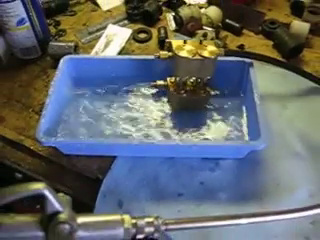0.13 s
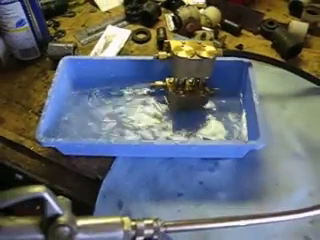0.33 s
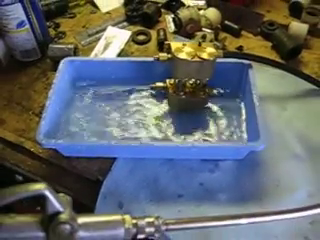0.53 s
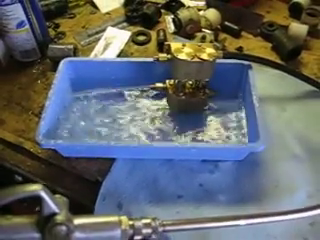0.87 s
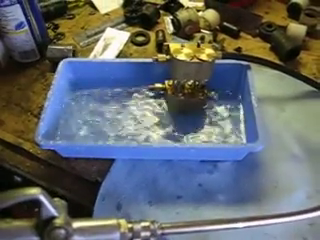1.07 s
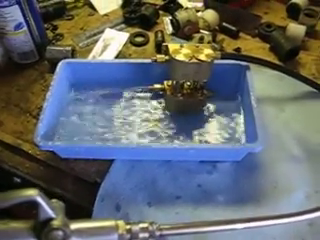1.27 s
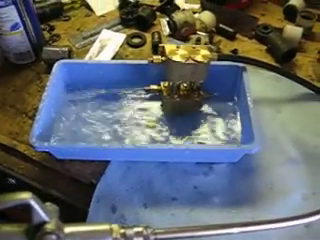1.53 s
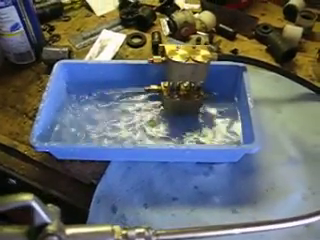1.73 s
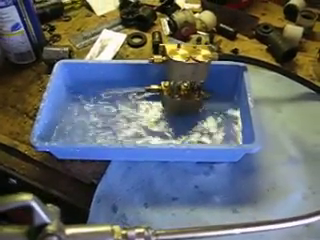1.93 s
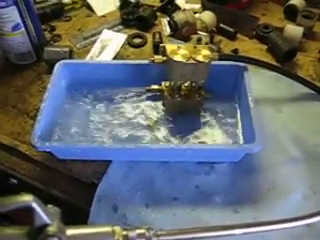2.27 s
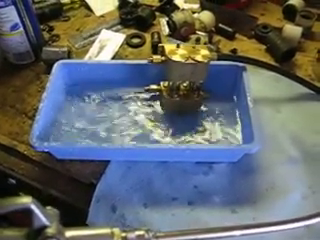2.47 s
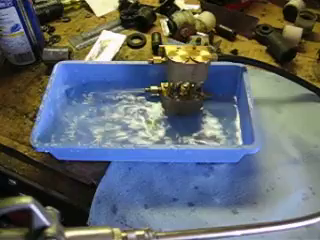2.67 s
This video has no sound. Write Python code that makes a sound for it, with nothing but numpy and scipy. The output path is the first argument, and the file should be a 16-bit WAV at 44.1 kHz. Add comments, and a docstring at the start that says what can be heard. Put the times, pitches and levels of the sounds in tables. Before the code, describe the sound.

Small steam pump running fast on compressed air, raspy puffs, brassy ticks and water churning beneath

```python
"""A small two-cylinder steam pump runs on air in a tub of water on a bench, its crank slowing a little.
From the start the water churns, with bubbles as rising sine blips. Each crank turn gives four exhausts: shaped
noise for puff and hissing tail over a low push. Valves and rods click as decaying modes of the brass frame. Some
strokes ring frame and tub harder, as single decaying sines. About two seconds in the sound skips ahead once, with
a small jolt. Hiss and churn are brightest near 4 kHz; bench and tub colour all; a small microphone shuts above 6 kHz."""
import sys
import numpy as np
from scipy import signal
from scipy.fft import rfft, irfft, next_fast_len
from scipy.io import wavfile
from scipy.ndimage import map_coordinates

SR = 44100
rng = np.random.default_rng(int(sys.argv[2]) if len(sys.argv) > 2 else 0)


def master_out(mix):
    """Clip the mix to full scale and print it as 16-bit PCM to the path in sys.argv[1]."""
    frames = np.transpose(np.atleast_2d(mix))
    ceiling = np.clip(frames, -1, 1)
    pcm = np.round(ceiling * 32767).astype(np.int16)
    wavfile.write(sys.argv[1], SR, pcm)


def boost(x):
    """Linear amplitude factor 10**(x/20) for a level x in decibels (scalar or array-like)."""
    u = np.asarray(x, float) / 20
    return 10 ** u


N = 123039
SKIP_AT_S, SKIP_S = 2.0208, 0.0233
LONG = N + round(SKIP_S * SR)  # samples before the skip is cut out


def unit(x):
    """Scale to rms 1."""
    return x / np.sqrt(np.mean(x ** 2) + 1e-20)


def resonances_db(hz, peaks):
    """Sum of bell-shaped peaks and dips (Hz, width Hz, dB)."""
    return sum(db / (1 + (2 * (hz - centre) / width) ** 2) for centre, width, db in peaks)


def noise(points, peaks=()):
    """Noise of rms 1 coloured by (Hz, dB) points and extra peaks."""
    m = next_fast_len(LONG + 8192)
    hz = np.fft.rfftfreq(m, 1 / SR)
    point_hz, point_db = np.transpose(points)
    db = np.interp(np.log(hz + 1), np.log(point_hz + 1), point_db) + resonances_db(hz, peaks)
    return unit(irfft(rfft(rng.standard_normal(m)) * boost(db), m)[:LONG])


def wobble(rate):
    """A smooth random curve, rate knots a second."""
    knots = rng.standard_normal(int(LONG * rate / SR) + 4)
    return map_coordinates(knots, [np.arange(LONG) * rate / SR])


def strikes(times, gains, shape):
    """Copies of shape at the given times, by convolution with an impulse train."""
    train = np.zeros(LONG + 2 * SR)  # a second of margin at each end
    np.add.at(train, np.round((times + 1) * SR).astype(int), gains)
    return signal.fftconvolve(train, shape)[SR:SR + LONG]


def fade(rise_s, t60_s):
    """Rise, then exponential fall."""
    t = np.arange(SR // 4) / SR
    return (1 - np.exp(-(t / rise_s) ** 2)) * boost(-60 * t / t60_s)


def unskipped(s):
    """Heard time to unbroken time [s]."""
    return s + SKIP_S * (s > SKIP_AT_S)


CHURN_DB, CHURN_WOBBLE_DB, CHURN_KNOTS_PER_S = -38, 1.1, 30
BUBBLE_DB, BUBBLE_SCATTER_DB = -37.5, 5.3  # ahead of the envelope
BUBBLE_HZ, BUBBLE_LOG_SPREAD, BUBBLE_CYCLES = 1569, 0.4, 17
# churning water, relative spectrum: (frequency [Hz], density [dB])
CHURN_SPECTRUM = [(15, -28.5), (25, -14), (49, -13.5), (107, -7), (363, -16), (892, -7), (1070, -22),
                  (4590, 1), (6190, -31), (8050, -54.5), (13600, -120)]


def water(count=150):
    """Wobbling noise churn plus bubbles, sine blips rising in pitch at random times."""
    luck, t = rng.standard_normal((count, 2)), np.arange(SR // 30) / SR
    at = rng.integers(0, LONG, count)
    hz = (BUBBLE_HZ * np.exp(BUBBLE_LOG_SPREAD * luck[:, 0]))[:, None]
    u = t * hz / BUBBLE_CYCLES
    tone = np.sin(2 * np.pi * hz * t * (1 + 0.1 * np.minimum(u, 1)))
    pops = boost(BUBBLE_DB + BUBBLE_SCATTER_DB * luck[:, 1:]) * tone * u * np.exp(1 - 3.5 * u)
    index = at[:, None] + np.arange(len(t))
    bubbles = np.bincount(index.ravel(), pops.ravel())[:LONG]
    churn = boost(CHURN_DB + CHURN_WOBBLE_DB * wobble(CHURN_KNOTS_PER_S)) * noise(CHURN_SPECTRUM)
    return churn + np.pad(bubbles, (0, LONG - len(bubbles)))


# dead centre of each crank turn: (time [s], click level [dB])
CRANK_TURNS = [(0.0585, -10.5), (0.193, -9.5), (0.3258, -11), (0.4597, -10), (0.595, -9), (0.7293, -9),
               (0.8644, -11.5), (0.9992, -11), (1.1357, -10.5), (1.2708, -9), (1.4065, -10), (1.544, -9.5),
               (1.6802, -9.5), (1.8164, -8.5), (1.953, -9.5), (2.0664, -9.5), (2.203, -8), (2.3405, -10.5),
               (2.4775, -9.5), (2.615, -10.5), (2.7534, -8.5)]


def crank():
    """Start, length and click level of every turn on unbroken time, one turn added ahead."""
    s, db = np.transpose(CRANK_TURNS)
    s = unskipped(s)
    s = np.r_[2 * s[0] - s[1], s, 2 * s[-1] - s[-2]]
    return s[:-1], np.diff(s), np.r_[db.mean(), db]


SPUTTER_DB, SPUTTER_KNOTS_PER_S = 2, 900
SCATTER_DB, SCATTER_TURNS, PLAY_TURNS = 0.9, 0.0015, 0.003
RUMBLE_SCATTER_DB, SWING_SCATTER_DB, SWING_CYCLES = 1.6, 2.0, 0.31
PUFF_RISE_S, TAIL_RISE_S, PUSH_T60_S = 0.0016, 0.0036, 0.062
# exhausts of a turn: (phase [turns], puff level [dB], puff t60 [s], tail level [dB], tail t60 [s])
EXHAUST_EVENTS = [(-.02, -25.5, 0.051, -21, 0.19), (0.214, -20, 0.064, -22, 0.055),
                  (.475, -20.5, 0.059, -19, 0.14), (0.724, -22, 0.059, -21, 0.19)]
# tail colour of each port, two rows each: (frequency [Hz], width [Hz], gain [dB])
PORT_PEAKS = [
    [(3720, 220, 5), (2500, 380, 5)],
    [(4500, 250, 8.5), (3880, 300, -5)],
    [(3880, 440, 3.5), (3400, 400, 3)],
    [(4290, 400, -2.5), (2550, 270, -3.5)],
]
# low push of air: (phase [turns], swing frequency [Hz], swing level [dB], rumble level [dB])
AIR_PUSHES = [(-.023, 187.6, -31, -31), (0.217, 191, -31, -30), (.472, 207, -30.5, -31.5),
              (0.725, 131.2, -31, -34)]
# push rumble, relative spectrum: (frequency [Hz], density [dB])
PUSH_SPECTRUM = [(25, -9), (60, 1.5), (110, 1), (200, -7.5), (320, -12.5), (600, -10), (1200, -54.5)]
# broad puff, relative spectrum: (frequency [Hz], density [dB])
PUFF_SPECTRUM = [(150, -50.5), (250, -13.5), (1380, -10), (1680, -10.5), (2140, -10.5), (2590, -11),
                 (3670, -6), (4610, 0), (4800, -19.5), (5060, -3.5), (6190, -44.5), (8050, -68),
                 (13600, -120)]
# hissing tail, relative spectrum: (frequency [Hz], density [dB])
TAIL_SPECTRUM = [(88, -44), (150, -15), (259, -6.5), (460, -14), (1270, -17), (1900, -12.5), (2400, -10.5),
                 (3030, -11.5), (4000, 1.5), (5060, -12), (5730, -23.5), (6190, -48.5), (8050, -61.5),
                 (13600, -120)]


def exhaust():
    """Each port opens with a broad noise puff and a low push, then hisses and sputters away."""
    start, length, _ = crank()
    out, t = np.zeros(LONG), np.arange(SR // 50) / SR
    for event, port, air_push in zip(EXHAUST_EVENTS, PORT_PEAKS, AIR_PUSHES):
        at, puff_db, puff_t60_s, tail_db, tail_t60_s = event
        push_at, swing_hz, swing_db, rumble_db = air_push
        luck = rng.standard_normal((len(start), 5))

        open_s = start + length * (at + SCATTER_TURNS * luck[:, 0])
        puff_gain = boost(puff_db + SCATTER_DB * luck[:, 1])
        puff = strikes(open_s, puff_gain, fade(PUFF_RISE_S, puff_t60_s)) * noise(PUFF_SPECTRUM)
        tail_gain = boost(tail_db + SCATTER_DB * luck[:, 2])
        tail = strikes(open_s, tail_gain, fade(TAIL_RISE_S, tail_t60_s)) * noise(TAIL_SPECTRUM, port)

        push_s = start + length * (push_at + PLAY_TURNS * luck[:, 0])
        rumble_gain = boost(rumble_db + RUMBLE_SCATTER_DB * luck[:, 4])
        rumble = strikes(push_s, rumble_gain, fade(TAIL_RISE_S, PUSH_T60_S)) * noise(PUSH_SPECTRUM)
        u = t * swing_hz / SWING_CYCLES
        swing_shape = np.sin(2 * np.pi * swing_hz * t) * u * np.exp(1 - u)
        swing = strikes(push_s, boost(swing_db + SWING_SCATTER_DB * luck[:, 3]), swing_shape)

        sputter = boost(SPUTTER_DB * wobble(SPUTTER_KNOTS_PER_S))
        out += (puff + tail) * sputter + rumble + swing
    return out


DETUNE, PHASE_SCATTER_RAD = 0.008, 0.4
MODE_SCATTER_DB, CONTACT_SCATTER_DB = 1.5, 1.5
CLICK_TRIM_DB, CLICK_RISE_S = -4.5, 0.00047
# valve and rod contacts: (phase [turns], level re turn's click [dB], best-excited frequency [Hz],
# spread [Hz], share of the frame's ring time [1])
ROD_CONTACTS = [(-.008, -11, 4000, 900, 0.61), (.024, -9.5, 3490, 399, .7), (.092, -14.5, 4500, 401, .7),
                (.234, -5, 5260, 451, 0.82), (.248, -2.5, 4570, 400, 0.42), (.266, -7, 3450, 120, 1.3),
                (.434, -15.5, 3400, 990, 0.44), (.488, -4.5, 4200, 600, .5), (.5, -7, 2550, 500, 0.48),
                (.506, -9.5, 4630, 513, 0.71), (.532, -8.5, 4660, 496, 0.76), (.538, -11, 3450, 294, 0.92),
                (.76, -7, 4660, 608, 0.4), (.948, -10.5, 2580, 502, 0.5)]
# sharpest contact, by dead centre: (phase [turns], level [dB], frequency [Hz], spread [Hz], share [1])
DEAD_CENTRE_TICK = [(.007, 5, 4800, 600, .4)]
# brass frame modes: (nominal frequency [Hz], level [dB], t60 at share 1 [s])
FRAME_MODES = [(1440, 8, 0.042), (1820, 3, .04), (2265, -4.5, 0.036), (2492, 1.5, .025), (2737, 1, 0.026),
               (3310, 6, 0.018), (3450, 5.5, 0.025), (3724, -10, 0.0088), (4140, -7, 0.012),
               (4570, 3.5, 0.026), (4793, -0.5, 0.022), (5225, -8, 0.017), (5550, -26.5, 0.004)]


def linkage():
    """Every contact rings the frame modes near its best-excited pitch, a little differently each turn."""
    out, t = np.zeros(LONG + 2 * SR), np.arange(SR // 20) / SR
    hz, level_db, t60_s = np.transpose(FRAME_MODES)[:, :, None]
    rise = 1 - np.exp(-t / CLICK_RISE_S)
    for start, length, click_db in zip(*crank()):
        for at, relative_db, best_hz, spread_hz, share in DEAD_CENTRE_TICK + ROD_CONTACTS:
            luck = rng.standard_normal((len(hz) + 1, 3, 1))
            contact_luck, mode_luck = luck[0], luck[1:]
            scatters = relative_db < 0  # the tick has no scatter of time or overall level
            mode_gain = boost(level_db + MODE_SCATTER_DB * mode_luck[:, 0])
            weight = mode_gain / (1 + ((hz - best_hz) / spread_hz) ** 2)
            mode_hz = hz * (1 + DETUNE * mode_luck[:, 1])
            tone = np.sin(2 * np.pi * mode_hz * t + PHASE_SCATTER_RAD * mode_luck[:, 2])
            ring = (weight * tone * boost(-60 * t / (t60_s * share))).sum(0)
            scatter_db = CONTACT_SCATTER_DB * contact_luck[0, 0] * scatters
            size_db = click_db + CLICK_TRIM_DB + relative_db + scatter_db
            phase = at + PLAY_TURNS * contact_luck[1, 0] * scatters
            i = round((1 + start + length * phase) * SR)
            out[i:i + len(t)] += boost(size_db) * ring * rise
    return out[SR:SR + LONG]


TUB_RING_RISE_S, TUB_RING_T60_S, TUB_RING_TRIM_DB = 0.00067, 0.041, -4.5
# strokes that ring the frame and tub harder: (time [s], level before trim [dB], frequency [Hz])
TUB_RING_EVENTS = [(0.0232, -23, 1850), (0.1236, -21, 1820), (0.5274, -32, 1865), (0.5601, -27, 1540),
                   (0.6933, -21, 1440), (0.7965, -24.5, 1800), (0.9672, -20.5, 1440), (1.9165, -20, 1820),
                   (2.1337, -21.5, 1442), (2.27, -21, 1820), (2.4451, -21.5, 1840), (2.7195, -18.5, 1453)]


def tub_rings():
    """Strokes that ring the frame and tub harder, 1.4-1.9 kHz, one decaying sine each."""
    t, out = np.arange(SR // 4) / SR, np.zeros(LONG)
    for s, db, hz in TUB_RING_EVENTS:
        ring = np.sin(2 * np.pi * hz * t) * fade(TUB_RING_RISE_S, TUB_RING_T60_S)
        out += strikes(np.array([unskipped(s)]), boost(db + TUB_RING_TRIM_DB), ring)
    return out


TOP_HZ = 6150
# reflections off bench and tub: (frequency [Hz], width [Hz], gain [dB])
BENCH_PEAKS = [(364, 160, -6), (921, 100, 4), (1087, 190, -2.5), (1820, 38, 4), (2070, 110, -2),
               (3690, 70, -6), (4684, 36, -5.5), (4850, 160, 2), (5080, 80, -3), (5370, 100, -0.5)]


def bench_and_microphone(x):
    """Reflections boost and dip narrow bands; the microphone's top closes steeply."""
    m = next_fast_len(LONG + 8192)
    hz = np.fft.rfftfreq(m, 1 / SR)
    top = 1 / (1 + (hz / TOP_HZ) ** 60)
    return irfft(rfft(x, m) * boost(resonances_db(hz, BENCH_PEAKS)) * top, m)


JUMP_DB, JUMP_SAMPLES = -20, 40


def skip_ahead(x):
    """Drop a short stretch; the waveform jumps at the join and settles exponentially."""
    cut = round(SKIP_AT_S * SR)
    after = x[cut + LONG - N:LONG]
    jump = x[cut] - after[0] + boost(JUMP_DB)
    return np.r_[x[:cut], after + jump * np.exp(-np.arange(len(after)) / JUMP_SAMPLES)]


def scene():
    """All sources, through bench and microphone, with a short stretch skipped."""
    sources = water() + exhaust() + linkage() + tub_rings()
    return skip_ahead(bench_and_microphone(sources))[None]


def top_cut(x):
    """Nothing passes above the cut-off."""
    return signal.sosfilt(signal.butter(12, 15800, fs=SR, output="sos"), x)


OFFSET = 0.0107  # of full scale


def record(dry):
    """Adds a small constant offset."""
    mix = dry + OFFSET
    return top_cut(mix)


dry = scene()
out = record(dry)
master_out(out)
```